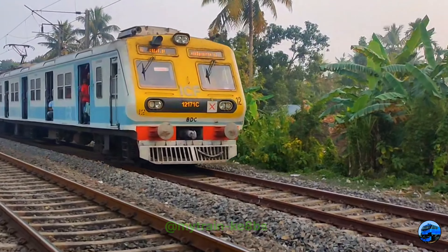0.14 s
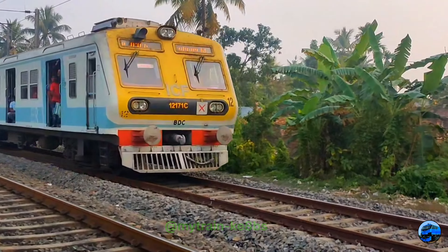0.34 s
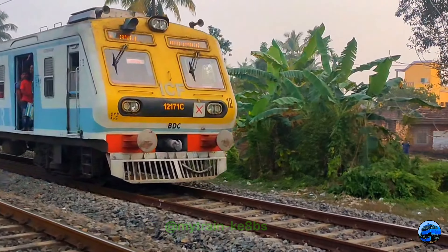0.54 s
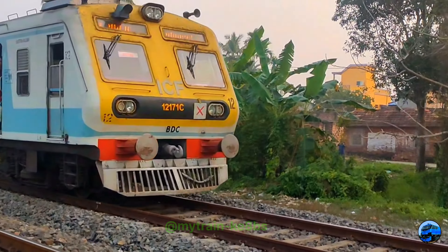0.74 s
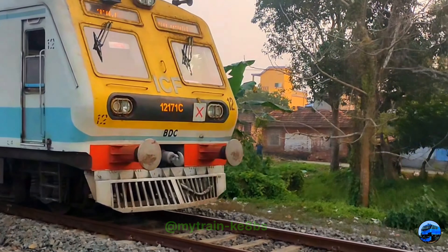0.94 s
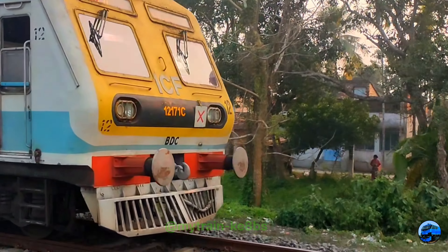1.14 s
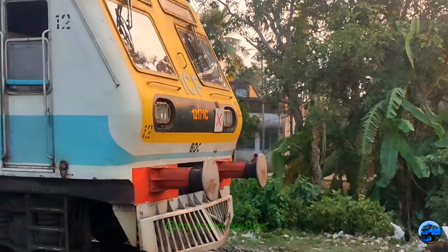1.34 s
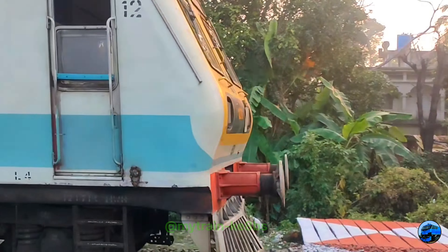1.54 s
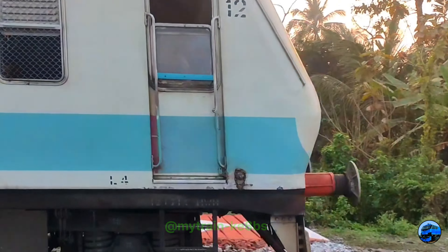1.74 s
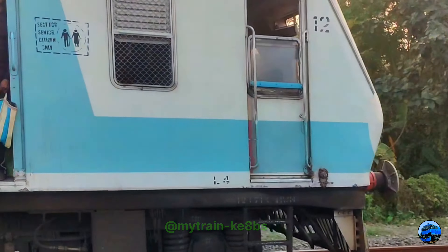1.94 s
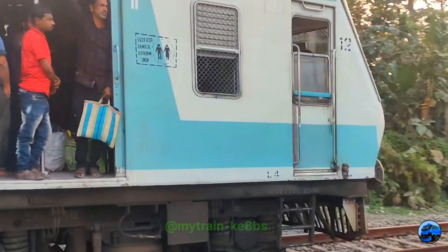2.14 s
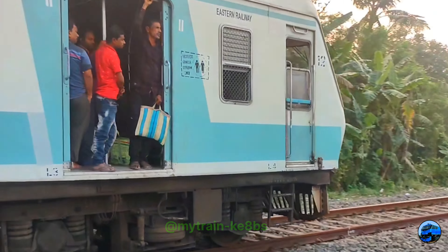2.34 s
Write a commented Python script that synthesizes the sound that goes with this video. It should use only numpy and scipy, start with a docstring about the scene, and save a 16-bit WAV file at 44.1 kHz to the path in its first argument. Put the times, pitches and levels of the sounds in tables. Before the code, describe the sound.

A train's loud air horn sounds after half a second of low rolling rumble: two short, nearly joined blasts, then a long one sagging in pitch as the train passes close to a trackside microphone outdoors.

```python
"""Two air horns sound two short blasts and a long one as an electric train runs in and passes close by.
Each horn is a sum of phase-locked partials; the low one joins the high one as the air builds.
Both sink in pitch and the high one dulls as the cab passes; the trees ahead echo the approach pitch.
Combination tones, a buzz and hissing air join the horns; rumble, rail hiss, knocks and a bogie's drone
are filtered noise. The recorder's gain control ducks the sound under the loud horns.
"""
import sys
import numpy as np
from scipy import signal
from scipy.fft import rfft, irfft, next_fast_len
from scipy.io import wavfile
from scipy.ndimage import uniform_filter1d, minimum_filter1d, map_coordinates

SR = 44100
rng = np.random.default_rng(int(sys.argv[2]) if len(sys.argv) > 2 else 0)


def log_audio(samples):
    """Write samples as a 16-bit WAV file to the path given in sys.argv[1]."""
    # one column per channel
    frames = np.atleast_2d(samples).T
    # limit to full scale, then quantise
    limited = np.clip(frames, -1, 1)
    pcm = np.round(limited * 32767).astype(np.int16)
    wavfile.write(sys.argv[1], SR, pcm)


N = 110250  # samples

# All levels are relative: scene() lifts all but the wheels by HORN_LIFT_DB, then record() sets the gain.

# Noise of wheels on rails: [t/s, rumble level/dB, rail hiss level/dB]
ROLLING_LEVELS = [(0, -29.5, -37.5), (.13, -23, -35.5), (.24, -28.5, -35), (.34, -22.5, -34),
                  (.42, -26.5, -32.5), (.5, -31.5, -31), (.6, -26, -37), (.9, -37.5, -27), (1.12, -20, -26),
                  (1.4, -35.5, -32.5), (1.6, -35.5, -25.5), (1.9, -34, -27.5), (2.5, -26, -28)]
# Spectra of the rumble and of the rail hiss: [f/Hz, level/dB]
RUMBLE_SPECTRUM = [(15, -51.5), (25, -17.5), (77, -3.5), (102, 1), (130, -2.5), (166, -19), (199, -14.5),
                   (306, -24.5), (344, -8), (400, -11.5), (520, -41), (880, -120)]
RAIL_SPECTRUM = [(150, -27), (250, -8.5), (350, -10.5), (600, -13), (900, -10.5), (1400, -19), (1900, -19),
                 (2900, -17), (4200, -22.5), (5200, -28.5), (8000, -23), (9800, -35.5), (13000, -36),
                 (15000, -47)]
# Wheels striking rail joints: [t/s, level/dB]
JOINT_KNOCKS = [(1.116, -14), (1.68, -14), (1.948, -13.5)]
# Spectrum of a knock: [f/Hz, level/dB]
KNOCK_SPECTRUM = [(30, -10), (90, -6), (180, 0.5), (400, -9.5), (1500, -38.5), (8000, -63)]
# Left-right correlation of every noise: [f/Hz, correlation]
NOISE_CORRELATION = [(130, 1), (290, 0.92), (640, 0.94), (1400, .05), (3000, 0.72), (7000, 0.04)]
# Left-minus-right level of every noise: [f/Hz, level/dB]
NOISE_BALANCE = [(700, -0.5), (1300, 2), (2400, -2), (4400, -3), (8000, -8), (15000, -10.5)]

# High horn in the short blasts and the long one: [t/s, fundamental level/dB, overtone level/dB]
SHORT_BLASTS = [(.495, -54, -84), (.508, -43.5, -52.5), (.519, -11, -34.5), (.53, -6, -18),
                (.63, -8.5, -17), (.685, -6, -19.5), (.742, -13, -34.5), (.77, -8, -21.5), (.82, -7.5, -19),
                (.87, -9, -21.5), (.93, -15, -33), (.99, -20, -44), (1.03, -33.5, -57),
                (1.047, -24.5, -34.5), (1.068, -41, -60)]
LONG_BLAST = [(1.086, -24, -65), (1.102, -31, -51), (1.118, -8, -24), (1.16, -9, -23), (1.203, -12, -13.5),
              (1.232, -5.5, -19.5), (1.3, -11, -20), (1.41, -7.5, -23), (1.52, -7, -28), (1.6, -10, -25),
              (1.76, -13, -24), (1.93, -9.5, -24.5), (2.16, -8.5, -28.5), (2.27, -14.5, -33.5),
              (2.35, -10.5, -28), (2.5, -13.5, -30)]
# Pitch of the high horn, falling as the cab passes: [t/s, f/Hz]
HIGH_PITCH = [(.49, 722), (.535, 764.3), (.64, 761), (.72, 759.5), (.87, 760.4), (1.0, 752.5),
              (1.09, 746.6), (1.135, 761.4), (1.2, 760), (1.3, 756.8), (1.5, 749.4), (1.7, 745.6),
              (1.9, 735.5), (2.1, 729.9), (2.3, 726.5), (2.5, 722)]
# High horn's overtones from the front and from the side: [multiple, level/dB]
FRONT_PARTIALS = [(2, -16), (3, -13), (4, -20), (5, -31), (6, -38), (7, -53.5), (8, -45), (9, -39),
                  (10, -39.5), (11, -46.5), (13, -49.5), (15, -52), (18, -44.5), (20, -51)]
SIDE_PARTIALS = [(2, -12), (3, -21), (4, -21), (5, -29.5), (6, -33.5), (7, -43), (8, -50.5), (10, -41.5),
                 (12, -50.5), (15, -59), (18, -51.5), (20, -58)]
# Lead of the left microphone over the right: [t/s, lead/ms]
LEFT_LEAD = [(.5, 0.038), (.85, 0.013), (1.1, 0.13), (1.4, 0.072), (1.7, 0.064), (2.0, 0.03)]
# Left-minus-right level of all horn tones: [f/Hz, level/dB]
HORN_BALANCE = [(300, 0.3), (750, 0), (1500, 2.5), (2300, 1.5), (3100, -2.5), (4400, -7.5), (8000, -9),
                (14000, -9)]

# Rush of air through the horns: [t/s, level/dB], and its spectrum: [f/Hz, level/dB]
AIR_LEVEL = [(.5, -77), (.525, -39), (.57, -49.5), (.62, -55), (.655, -35), (.7, -56), (.8, -48),
             (.87, -56), (1.0, -54.5), (1.095, -44), (1.12, -37), (1.21, -41), (1.28, -47), (1.38, -39.5),
             (1.54, -41), (1.61, -51), (1.95, -45), (2.5, -47)]
AIR_SPECTRUM = [(200, -8.5), (400, -7.5), (900, 2), (1400, 1), (1850, -18.5), (2500, -3.5), (3300, -9.5),
                (5000, -11.5), (8000, -12), (10000, -22), (15000, -31.5)]
# Top treble of the air: [t/s, level/dB], and its spectrum: [f/Hz, level/dB]
SIZZLE_LEVEL = [(.505, -82.5), (.528, -40), (.58, -57.5), (.65, -52.5), (.72, -48), (.9, -51), (1.03, -65),
                (1.1, -63), (1.125, -45), (1.22, -57), (1.27, -65.5), (2.5, -63)]
SIZZLE_SPECTRUM = [(3000, -38.5), (7000, -1.5), (10500, -0.5), (12500, 15), (15000, -7.5)]

# Echo from the trees: [t/s, level/dB], and its partials: [multiple, level/dB]
ECHO_LEVEL = [(.5, -72), (.72, -41), (.95, -26.5), (1.06, -43.5), (1.2, -24), (1.6, -26), (1.9, -27.5),
              (2.2, -30), (2.5, -23.5)]
ECHO_PARTIALS = [(1, 0), (2, -14.5), (3, -13.5), (4, -21.5), (5, -22.5), (6, -33.5), (10, -35), (12, -38)]

# Low horn: [t/s, fundamental level/dB, overtone reference level/dB]
LOW_LEVELS = [(.6, -58.5, -71.5), (.69, -39, -64.5), (.76, -61, -60), (.82, -33.5, -56), (.875, -29, -29.5),
              (.96, -30, -50.5), (1.04, -45, -57), (1.09, -35.5, -57), (1.118, -22.5, -41.5),
              (1.16, -27.5, -46.5), (1.23, -30, -61.5), (1.3, -14.5, -28), (1.35, -16, -28.5),
              (1.45, -18.5, -29.5), (1.55, -19.5, -30), (1.75, -21, -35.5), (2.1, -24.5, -41.5),
              (2.3, -27, -40), (2.5, -25.5, -37)]
# Pitch of the low horn: [t/s, f/Hz]
LOW_PITCH = [(.6, 299.1), (.88, 303.4), (1.2, 305), (1.33, 301.6), (1.55, 296.2), (1.9, 292.9),
             (2.2, 290.7), (2.5, 288.3)]
# Low horn's overtones: [multiple, level/dB]
LOW_PARTIALS = [(2, 0.5), (3, -2.5), (4, -7.5), (5, -18), (6, -30), (7, -22.5), (8, -21), (9, -30),
                (12, -27), (16, -38), (24, -41.5)]

# Sum and difference tones of the two horns: [t/s, level/dB]
MIXING_LEVEL = [(.6, -77), (.68, -50), (.76, -64.5), (.86, -42), (.95, -59), (1.09, -63), (1.118, -47.5),
                (1.2, -41), (1.27, -46.5), (1.4, -42.5), (1.7, -54.5), (2.1, -63.5), (2.5, -59.5)]
# Sum tones: [multiple of the high horn, level/dB]
SUM_PARTIALS = [(1, 1), (2, -29), (3, -10), (4, -12), (6, -31.5)]
# Bright sum tones as the long blast starts: [t/s, level/dB]
SNARL_LEVEL = [(1.1, -81), (1.116, -34), (1.17, -36), (1.22, -38.5), (1.27, -66)]
# The same bright tones: [multiple of the high horn, level/dB]
SNARL_PARTIALS = [(1, -14.5), (2, -10.5), (3, 6), (4, -8.5), (5, -18), (10, -26)]
# Buzz an octave under the low horn: [t/s, level/dB], and its partials: [multiple, level/dB]
BUZZ_LEVEL = [(.8, -65.5), (.87, -62.5), (.95, -75), (1.1, -63.5), (1.12, -41), (1.21, -46), (1.28, -61.5),
              (1.38, -46.5), (1.46, -51), (1.54, -41.5), (1.62, -64), (2.5, -64.5)]
BUZZ_PARTIALS = [(1, -1.5), (2, -6), (7, 1), (9, -4), (12, -2), (16, -9), (24, -12), (32, -19), (40, -22.5)]

# Drone of the leading bogie: [t/s, level/dB], and its spectrum: [f/Hz, level/dB]
BOGIE_LEVEL = [(1.0, -77), (1.6, -54.5), (2.0, -46), (2.5, -42)]
BOGIE_SPECTRUM = [(60, -19), (130, -4.5), (190, -3), (260, -4), (500, -16), (1500, -41)]

KNOCK_RISE_S, KNOCK_T60_S = 0.0036, 0.19  # rise time constant, time to decay by 60 dB
HIGH_ON_S, LOW_ON_S, FADE_S = 0.495, 0.56, 0.05
TURN_START_S, TURN_END_S = 1.2, 1.354  # the bells swing from front to side
ECHO_HZ = 757.8
HORN_LIFT_DB = 20
CEILING_DB, RELEASE_DB_PER_S = -0.62, 0.35
TOP_HZ = 15500


def amp(db):
    """Amplitude ratio from level: 20 dB for each factor of ten."""
    return 10 ** (np.asarray(db) / 20)


def unit(x):
    """Power normalisation: scale to rms 1."""
    return x / np.sqrt(np.mean(x ** 2) + 1e-20)


def along(points, hz):
    """Logarithmic frequency scale: interpolate values between (f/Hz or multiple, value) points."""
    f, values = np.transpose(points)
    return np.interp(np.log(hz + 1e-9), np.log(f), values)


def curves(rows):
    """Linear interpolation in time: one value per sample for each column after t/s."""
    times, *columns = np.transpose(rows)
    return [np.interp(np.arange(N) / SR, times, column) for column in columns]


def ramp(start_s, end_s):
    """Linear transition: 0 before the start, 1 after the end."""
    return np.clip((np.arange(N) / SR - start_s) / max(end_s - start_s, 1e-3), 0, 1)


def wobble(rate):
    """Band-limited fluctuation: a smooth curve through random knots, rate of them a second."""
    coarse = np.arange(0, N + 64, 64)
    knots = rng.standard_normal(1024)
    smooth = map_coordinates(knots, [coarse * rate / SR], mode="wrap")
    return np.interp(np.arange(N), coarse, smooth)


def filtered(x, response):
    """Linear filtering: multiply the spectrum by a response of frequency."""
    size = next_fast_len(N + SR // 2)
    spectrum = rfft(x, size) * response(np.fft.rfftfreq(size, 1 / SR))
    return irfft(spectrum, size)[..., :N]


def panned(db):
    """Constant-power panning: left and right gains for a level difference."""
    gains = amp(np.array([db, -db]) / 2).reshape(2, -1)
    return gains / np.sqrt(np.mean(gains ** 2, axis=0))


def rush(spectrum, patchy_db):
    """Partly coherent turbulence: stereo noise of rms 1 with patches of random gain."""
    cells = signal.stft(rng.standard_normal((2, N)), nperseg=512)[2]
    patches = uniform_filter1d(rng.standard_normal(cells.shape[1:]), size=6, axis=0)
    patches = uniform_filter1d(patches, size=12, axis=1)
    pair = signal.istft(cells * amp(patchy_db * unit(patches)), nperseg=512)[1][:, :N]

    def mid_side_response(hz):
        # the share of mid and side sets the left-right correlation
        angle = np.arccos(np.clip(along(NOISE_CORRELATION, hz), -1, 1)) / 2
        return amp(along(spectrum, hz)) * [np.cos(angle), np.sin(angle)]

    mid, side = filtered(pair, mid_side_response)
    stereo = np.array([mid + side, mid - side])
    return unit(filtered(stereo, lambda hz: panned(along(NOISE_BALANCE, hz))))


def voice(pitch, levels, scatter, scatter_rate, spread, jitter, shift=0):
    """Harmonic series locked to a diaphragm's cycle, all moved by shift Hz.

    Ground and train scatter each partial; overtones differ in phase between the microphones.
    """
    left_right = np.array([[1], [-1]])
    lead_ms, = curves(LEFT_LEAD)
    cycles = np.cumsum(pitch * (1 + jitter * wobble(110))) / SR
    cycles = cycles + left_right / 2 * pitch * lead_ms / 1000
    shift_cycles = np.cumsum(shift * np.ones(N)) / SR
    out = np.zeros((2, N))
    for k, db in enumerate(levels, 1):
        depth = scatter * min(k, 4)
        apart = spread * np.log(min(k, 6)) * np.tanh(wobble(4.08)) * left_right
        phase = 2 * np.pi * (k * cycles + shift_cycles + rng.random())
        phase = phase + depth * wobble(scatter_rate) + apart
        size = np.sqrt(2) * amp(db) * (1 + depth * wobble(scatter_rate))
        balance = panned(along(HORN_BALANCE, k * pitch.mean()))
        out += size * balance * np.cos(phase)
    return out


def wheels():
    """Rolling excitation: lumpy rumble, rail hiss and a few dull, decaying knocks at the joints."""
    rumble_db, hiss_db = curves(ROLLING_LEVELS)
    low_noise = filtered(rush(RUMBLE_SPECTRUM, patchy_db=2), lambda hz: 1 / (1 + (hz / 380) ** 6))
    rumble = amp(rumble_db) * unit(low_noise * amp(1.4 * wobble(35)))
    hiss = amp(hiss_db) * rush(RAIL_SPECTRUM, patchy_db=2.5)
    blows = np.zeros(N)
    for start_s, db in JOINT_KNOCKS:
        age = np.maximum(np.arange(N) / SR - start_s, 0)
        blows += amp(db - 60 * age / KNOCK_T60_S) * (1 - np.exp(-age / KNOCK_RISE_S))
    return rumble + hiss + blows * rush(KNOCK_SPECTRUM, patchy_db=1.0)


def high_horn():
    """Directivity of a horn: the leading one is brassy from the front, rounder from the side."""
    pitch, = curves(HIGH_PITCH)
    base_db, over_db = curves(np.vstack([SHORT_BLASTS, LONG_BLAST]))
    turned = ramp(TURN_START_S, TURN_END_S)
    k = np.arange(2, 21)
    front, side = along(FRONT_PARTIALS, k), along(SIDE_PARTIALS, k)
    # equal overtone power from either direction
    front = front - 10 * np.log10(np.sum(amp(front) ** 2))
    side = side - 10 * np.log10(np.sum(amp(side) ** 2))
    levels = [base_db] + [over_db + a + (b - a) * turned for a, b in zip(front, side)]
    tone = voice(pitch, levels, scatter=0.058, scatter_rate=45, spread=0.53, jitter=0.0013)
    return ramp(HIGH_ON_S, HIGH_ON_S + FADE_S / 10) * tone


def air():
    """Jet turbulence: hiss that comes in bursts during the blasts."""
    air_db, = curves(AIR_LEVEL)
    sizzle_db, = curves(SIZZLE_LEVEL)
    body = amp(air_db) * rush(AIR_SPECTRUM, patchy_db=7.5)
    return body + amp(sizzle_db) * rush(SIZZLE_SPECTRUM, patchy_db=0.5)


def tree_echo():
    """Doppler effect by reflection: the trees ahead return the approach pitch, beating with the horn."""
    db, = curves(ECHO_LEVEL)
    levels = [db + along(ECHO_PARTIALS, k) for k in range(1, 13)]
    tone = voice(np.full(N, ECHO_HZ), levels, scatter=0.18, scatter_rate=14, spread=0.2, jitter=0.004)
    return ramp(LOW_ON_S, LOW_ON_S + FADE_S) * tone


def low_horn():
    """Pressure-driven diaphragm: the second horn speaks late and gains overtones at full pressure."""
    pitch, = curves(LOW_PITCH)
    base_db, over_db = curves(LOW_LEVELS)
    levels = [base_db] + [over_db + along(LOW_PARTIALS, k) for k in range(2, 25)]
    tone = voice(pitch, levels, scatter=0.081, scatter_rate=26, spread=0.45, jitter=0.0027)
    return ramp(LOW_ON_S, LOW_ON_S + FADE_S) * tone


def combination_tones():
    """Intermodulation: sum and difference tones of the two horns, with a rough buzz below them."""
    high, = curves(HIGH_PITCH)
    low, = curves(LOW_PITCH)
    mix_db, = curves(MIXING_LEVEL)
    snarl_db, = curves(SNARL_LEVEL)
    buzz_db, = curves(BUZZ_LEVEL)

    def tones(pitch, levels, shift):
        return voice(pitch, levels, scatter=0.05, scatter_rate=30, spread=0.3, jitter=0.0026, shift=shift)

    sums = tones(high, [mix_db + along(SUM_PARTIALS, k) for k in range(1, 7)], low)
    difference = tones(high, [mix_db - 13.5], -low)
    snarl = tones(high, [snarl_db + along(SNARL_PARTIALS, k) for k in range(1, 11)], low)
    buzz = tones(low / 2, [buzz_db + along(BUZZ_PARTIALS, k) for k in range(1, 37)], 0)
    return ramp(LOW_ON_S, LOW_ON_S + FADE_S) * (sums + difference + snarl + buzz)


def bogie():
    """Broadband source at close range: the leading bogie's noise drone swells as it draws level."""
    db, = curves(BOGIE_LEVEL)
    return amp(db) * rush(BOGIE_SPECTRUM, patchy_db=5)


def scene():
    """Superposition: the horns tower over the running noise."""
    horns = high_horn() + air() + tree_echo() + low_horn() + combination_tones()
    return wheels() + amp(HORN_LIFT_DB) * (horns + bogie())


def record(dry):
    """Peak limiting: gain that clamps at once and recovers slowly, slight overload, then a band limit."""
    peak_db = 20 * np.log10(np.abs(dry).max(axis=0) + 1e-9)
    excess_db = np.maximum(peak_db - CEILING_DB, 0)
    recovery_db = RELEASE_DB_PER_S * np.arange(N) / SR
    gain_db = recovery_db - np.maximum.accumulate(excess_db + recovery_db)
    gain_db = uniform_filter1d(minimum_filter1d(gain_db, size=260), size=260)
    x = dry * amp(gain_db)
    x = x + 0.022 * x ** 2  # lopsided bend
    x = x / (1 + np.abs(x / 0.95) ** 8) ** (1 / 8)  # rounded clipping
    return filtered(x, lambda hz: (hz < TOP_HZ) * hz ** 2 / (hz ** 2 + 15 ** 2))


dry = scene()
out = record(dry)
log_audio(out)
```